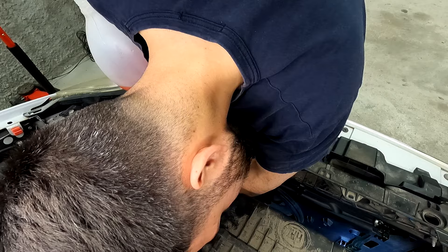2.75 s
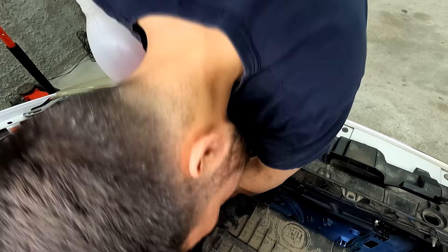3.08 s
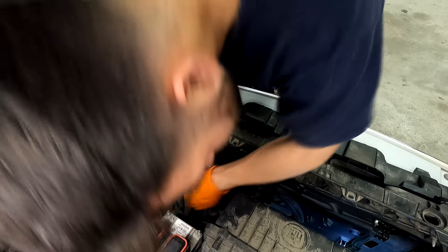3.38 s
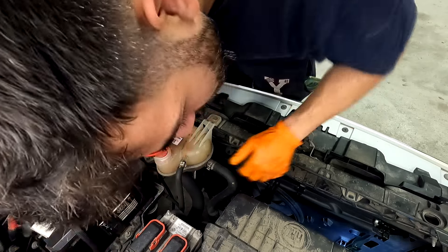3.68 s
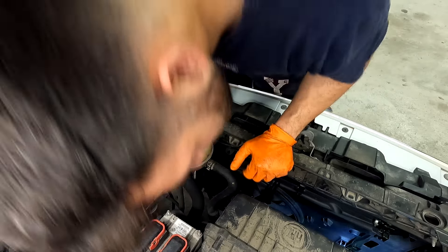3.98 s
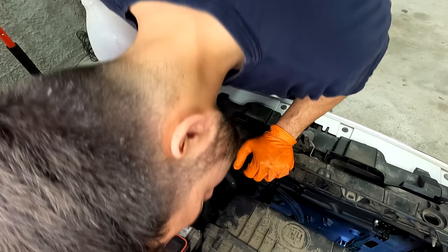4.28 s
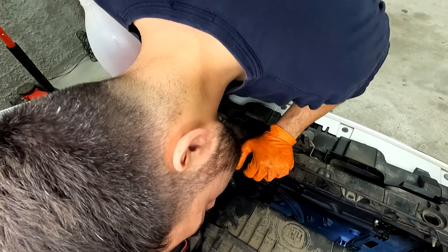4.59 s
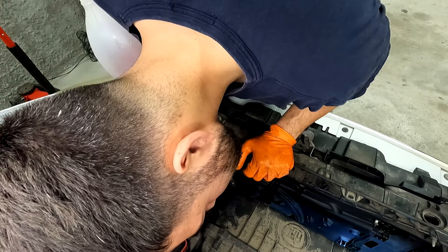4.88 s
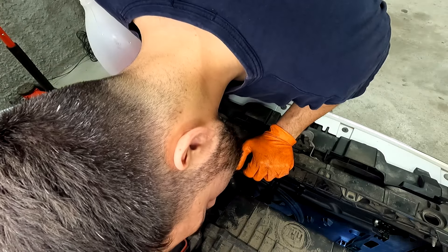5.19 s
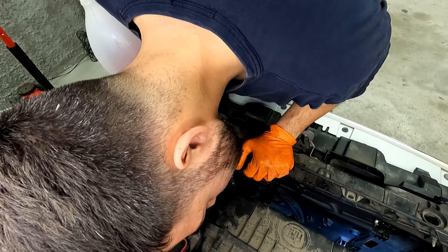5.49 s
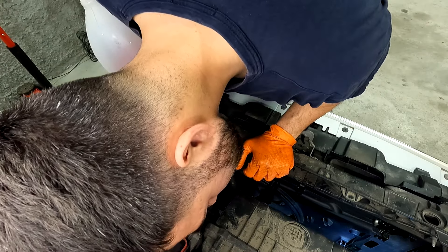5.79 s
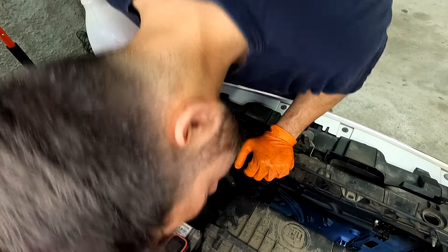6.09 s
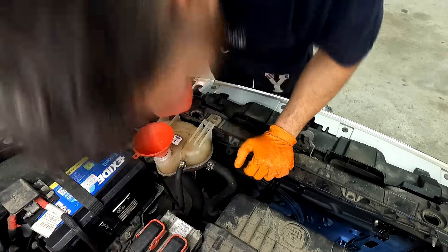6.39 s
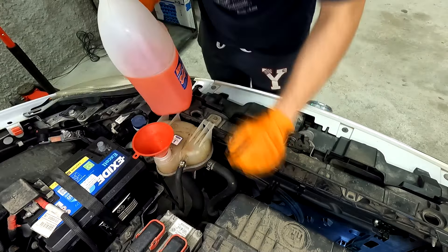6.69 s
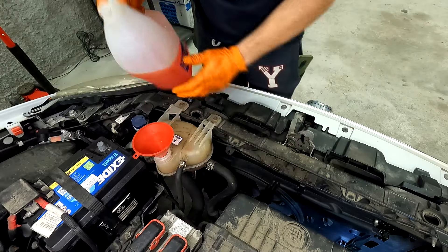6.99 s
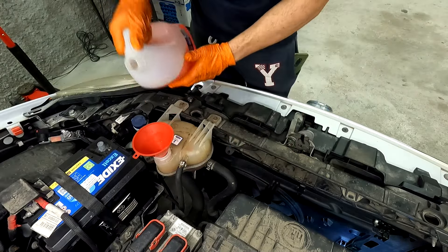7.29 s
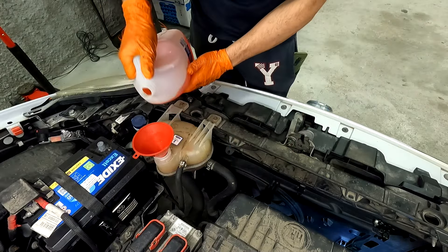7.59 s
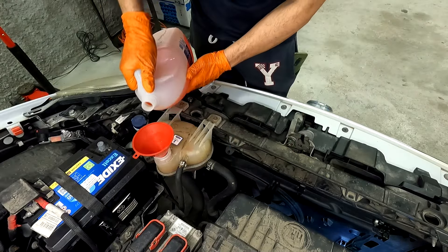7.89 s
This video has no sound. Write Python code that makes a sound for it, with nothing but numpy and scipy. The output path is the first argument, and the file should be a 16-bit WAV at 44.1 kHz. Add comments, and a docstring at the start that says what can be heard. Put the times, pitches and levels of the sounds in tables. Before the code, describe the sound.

Liquid glugs from a plastic jug, then trickles and gurgles steadily through a funnel into a car's hollow plastic tank.

```python
"""Coolant pours from a plastic jug through a funnel into a car's tank, in a garage.
First the jug glugs and booms as it gulps air, and a few drops tick. Then the stream gurgles on:
a swarm of bubbles, stirred up by the loud ones, rings in the hollow plastic. Each bubble is a
tiny, fading note; the bigger the bubble, the lower the note. Now and then the liquid sloshes,
once with a deep thump of the jug. The hard room adds a short echo and a faint hiss."""
import sys
import numpy as np
from scipy import signal
from scipy.io import wavfile

SR = 44100
rng = np.random.default_rng(int(sys.argv[2]) if len(sys.argv) > 2 else 0)


def transcribe(signal):
    """Save signal, clipped to [-1, 1], as a 16-bit WAV file at the path in sys.argv[1]."""
    frames = np.atleast_2d(signal).T
    limited = np.clip(frames, -1, 1)
    pcm = np.round(limited * 32767).astype(np.int16)
    wavfile.write(sys.argv[1], SR, pcm)


N = 399105
TIME = np.arange(N) / SR


def amp(db):
    """Turns decibels into a number to multiply a sound by."""
    return 10 ** (np.asarray(db) / 20)


def unit(x):
    """Scales a sound to an average strength (rms) of 1."""
    return x / np.sqrt(np.mean(x ** 2) + 1e-20)


def look_up(points, hz):
    """Reads between the rows of a table, with pitch spaced as on a piano."""
    f, value = np.transpose(points)
    return np.interp(np.log(hz + 1), np.log(f + 1), value)


def add(mix, s, sound):
    """Mixes a sound in, starting at s seconds."""
    part = mix[..., max(round(s * SR), 0):][..., :sound.shape[-1]]
    part += sound[..., :part.shape[-1]]


def place(x, pan_db=0):
    """Sends a sound to both ears; pan_db is how much louder the left one is."""
    return np.array([x * amp(pan_db / 2), x * amp(-pan_db / 2)])


def lowpass(x, hz, order=3):
    """Takes the treble off."""
    return signal.sosfilt(signal.butter(order, min(hz, .45 * SR), fs=SR, output="sos"), x)


def highpass(x, hz, order=3):
    """Takes the bass off."""
    return signal.sosfilt(signal.butter(order, hz, "high", fs=SR, output="sos"), x)


def wander(hz):
    """A random curve that drifts up and down, up to about hz times a second."""
    return unit(lowpass(rng.standard_normal(N), hz, order=2))


def colour(x, points, size=2048):
    """Shapes bass and treble to follow a table, while sharp starts stay sharp."""
    level_db = look_up(points, abs(np.fft.fftfreq(size, 1 / SR)))
    log_gain = np.log(amp(np.maximum(level_db, -90)))
    response = np.fft.ifft(np.exp(np.conj(signal.hilbert(log_gain)))).real[:size // 2]
    return signal.oaconvolve(x, response)[:len(x)]


def resonate(x, hz, width):
    """Rings at one pitch; the smaller the width, the longer the ring."""
    return signal.lfilter(*signal.iirpeak(min(hz, SR / 2 - 1), hz / min(width, SR / 4), SR), x)


def band(x, hz, width, widen=2):
    """Keeps the sound near one pitch, using a narrow filter and then a wider one."""
    return resonate(resonate(x, hz, width), hz, widen * width)


def ring(x, notes):
    """An object rings at all of its own notes at once."""
    return sum(amp(db) * resonate(x, hz, width) for hz, width, db in notes)


# The notes the jug's neck rings at: f/Hz, width/Hz, level/dB
NECK_NOTES = [(436, 13, 11.5), (644, 16, 10.5), (935, 16, 4.5), (1080, 37, -11), (1510, 4.3, 0),
              (2030, 12, -2)]
# Gulps of air: t/s, length/s, start f/Hz, end f/Hz, level/dB, loudest point/share of the length
GULPS = [(0.0, 0.016, 980, 1110, -45.5, 0.13), (0.029, 0.066, 425, 1186, -55.5, 0.61),
         (0.058, 0.02, 2550, 2800, -59, 0.48), (0.207, 0.095, 409, 1997, -47, 0.49),
         (0.285, 0.075, 584, 1092, -57, 0.74), (0.492, 0.072, 418, 1512, -47, 0.62)]


def glugs(level_db=-.5, neck_db=2, wobble=.017, rough=.42, wake_db=-19, wake_s=.022):
    """An air pocket pinches off and shrinks: its pitch climbs through the notes of the neck."""
    whistles, push = np.zeros((2, N))
    for s, length, start_hz, end_hz, db, loudest in GULPS:
        progress = np.arange(0, 1, 1 / (length * SR))
        shake, flutter = unit(lowpass(rng.standard_normal((2, SR // 4)), 250))[:, :len(progress)]
        hz = start_hz + (end_hz - start_hz) * np.sin(np.pi * progress ** 1.12 / 2) ** 2
        angle = 2 * np.pi * np.cumsum(hz * (1 + wobble * shake)) / SR
        hump = .18 + np.exp(-((progress - loudest) / .15) ** 2)
        swell = amp(db + level_db) * hump * signal.windows.tukey(len(progress), .15)
        add(whistles, s, swell * (1 + rough * flutter) * np.sin(angle))
        add(push, s, swell)
    # Each gulp leaves a hollow churning in its wake.
    churn = unit(band(rng.standard_normal(N), hz=1020, width=380))
    hold = np.exp(-1 / (wake_s * SR))
    wake = signal.lfilter([1 - hold], [1, -hold], push)
    out = whistles + amp(wake_db) * churn * wake
    return out + amp(neck_db) * ring(out, NECK_NOTES)


# The notes the tank and funnel ring at: f/Hz, width/Hz, level/dB
TANK_NOTES = [(904, 26, 6), (989, 56, 6.5), (1134, 80, -4.5), (1279, 96, -3.5), (1920, 130, -8.5),
              (2663, 270, -3), (3135, 93, -2.5), (3420, 60, 2.5), (3630, 36, -12), (4090, 27, -14),
              (4480, 45, -2), (4980, 83, -11), (5416, 80, -0.5)]


def tank(x, ring_db, uneven_db=0):
    """Adds the ring of the hollow plastic; uneven_db makes each note randomly louder or softer."""
    notes = TANK_NOTES
    if uneven_db:
        notes = [(hz, width, db + uneven_db * rng.standard_normal()) for hz, width, db in notes]
    return x + amp(ring_db) * ring(x, notes)


def bubble(hz, cycles, rise, size=2048):
    """A bubble rings and fades; its pitch climbs as it nears the surface."""
    age = hz * np.arange(size) / SR / cycles
    loudness = np.exp(-age) * (1 - np.exp(-(age * cycles) ** 2))
    return loudness * np.sin(2 * np.pi * cycles * (age + rise * (age - 1 + np.exp(-age))))


def burst(hz, cycles, rise, scatter, linger_s, stereo=.47, build_s=.00086, size=4096):
    """A bubble breaks into a cluster that echoes round the tank, a bit differently for each ear."""
    noise, t = rng.standard_normal((3, size)), np.arange(size) / SR
    fade = np.exp(-t / max(linger_s, .001)) * (1 - np.exp(-t / build_s))
    kicks = scatter * (noise[2] + stereo * noise[:2]) * fade
    kicks[:, 0] = 1  # the first bubble itself
    return signal.fftconvolve(kicks, bubble(hz, cycles, rise)[None], axes=1)[:, :size]


def plip(hz, length, rise=.064):
    """One bubble in the tank; where it bursts decides how strongly each tank note answers."""
    cluster = burst(hz / (1 + rise / 2), cycles=3.95, rise=rise, scatter=.2, linger_s=.86 * length)
    sound = tank(cluster, ring_db=-1, uneven_db=4)
    return sound / sound[:, :SR // 50].std()  # strength 1 over the first 20 ms


# Drops landing on plastic: t/s, level/dB, f/Hz, fade time/s
DROP_HITS = [(0.0, -56, 1960, 0.0016), (0.233, -54.5, 1980, 0.00055), (1.2837, -67, 6260, 0.025),
             (1.769, -70, 7450, 0.0063), (1.963, -58, 6600, 0.016), (2.159, -66, 2580, 0.023),
             (2.168, -58, 8230, 0.0029), (2.397, -66, 2840, 0.0067), (2.473, -65, 7040, 0.037),
             (2.635, -79, 5440, 0.0071), (2.89, -51, 3300, 0.054), (2.999, -45.5, 1160, 0.03),
             (3.0095, -44, 2100, 0.0043), (3.009, -48.5, 9900, 0.004), (3.0238, -45.5, 6200, 0.0044),
             (3.2532, -47, 5540, 0.016), (3.396, -42.5, 4800, 0.011), (3.6255, -42, 5500, 0.0046),
             (3.8764, -41, 1840, 0.0015), (4.2236, -42, 2420, 0.012), (4.2494, -49, 3070, 0.015),
             (4.639, -42, 2530, 0.029), (5.325, -44, 3450, 0.032), (6.3781, -41, 5100, 0.012),
             (6.523, -47, 2980, 0.011), (6.902, -44, 2190, 0.012), (7.299, -42.5, 1440, 0.0099),
             (7.345, -43.5, 5100, 0.013), (8.144, -44, 5470, 0.021), (8.233, -48, 2020, 0.0075),
             (8.774, -60, 4200, 0.014), (8.975, -46, 2200, 0.014)]


def splats(slap_db=-4, bubble_db=-7.5, stereo=.43, size=4096):
    """A drop slaps the plastic, makes it ring and traps a bubble of the same pitch."""
    out, t = np.zeros((2, N)), np.arange(size) / SR
    for s, db, hz, fade_s in DROP_HITS:
        noise = rng.standard_normal((3, size))
        crack = band(noise[2] + stereo * noise[:2], hz, width=.94 * hz)
        crack = crack * (1 - np.exp(-t / (.063 * fade_s))) * np.exp(-t / fade_s)
        slap = unit(lowpass(crack, min(4.8 * hz, 10500))) * np.sqrt(fade_s * SR / (2 * size))
        add(out, s, amp(db + slap_db) * tank(slap, ring_db=-4))
        add(out, s, amp(db + bubble_db) * plip(hz, length=.0069))
    return out


# The garage's background noise, from bass to treble: f/Hz, level/dB
ROOM_COLOUR = [(15, -33), (25, -16.5), (119, -24), (164, -3.5), (225, -9), (244, -10), (448, -22.5),
               (569, -24), (781, -26.5), (2030, -33), (2570, -42), (3930, -44.5), (6160, -40),
               (9170, -52.5), (14000, -61)]


def room_noise(level_db=-68.5, side_db=-13, waver_db=2):
    """The garage hisses steadily over a low murmur that wavers."""
    noise = np.array([unit(colour(rng.standard_normal(N), ROOM_COLOUR)) for _ in range(2)])
    waver = amp(waver_db * np.tanh(wander(hz=7)))
    middle, side = noise + (waver - 1) * lowpass(noise, 320, order=1)
    return amp(level_db) * (place(middle, pan_db=-11) + amp(side_db) * np.array([side, -side]))


# How the rumble of the air in the tank swells and sinks: t/s, level/dB
RUMBLE_LEVELS = [(2.0, -8.5), (2.9, -3), (3.2, 2.5), (3.55, -5.5), (3.9, 0.5), (4.8, -2.5), (5.4, -5.5),
                 (9.0, -10.5)]


def tank_rumble(level_db=-65, lumpy_db=6.5):
    """The stream keeps the air in the tank rumbling, in uneven lumps."""
    noise = band(rng.standard_normal(N), hz=160, width=85, widen=3)
    rumble = unit(highpass(noise, 130, order=6))
    lumps_db = lumpy_db * np.tanh(wander(hz=12))
    swell_db = np.interp(TIME, *np.transpose(RUMBLE_LEVELS))
    return place(amp(level_db + swell_db + lumps_db) * rumble)


# Booms of the air in the jug: t/s, f/Hz, level/dB, time to fade by 60 dB/s, build-up time/s
JUG_BOOMS = [(0.059, 106.8, -34, 0.33, 0.01), (0.086, 112, -43, 0.27, .006),
             (0.214, 108.6, -31.5, 0.33, 0.0061), (0.332, 108.5, -35.5, 0.097, 0.005),
             (0.509, 112, -37, 0.092, 0.0073), (6.743, 161, -42.5, 0.22, 0.009),
             (6.795, 134, -21.5, 0.071, 0.013), (6.849, 139, -31, .08, 0.013),
             (6.906, 145.3, -20, 0.17, 0.0074), (6.969, 140.5, -34.5, 0.18, 0.009)]


def booms(rumble_db=-21, rumble_fade_s=.52, flat=.052, settle_s=.011):
    """The jug's air bounces on its neck: a deep note that starts a bit flat, then a room rumble."""
    out, t = np.zeros(N), np.arange(SR // 2) / SR
    lag_s = flat * settle_s * (1 - np.exp(-t / settle_s))
    for s, hz, db, fade_s, build_s in JUG_BOOMS:
        note = np.sin(2 * np.pi * hz * (t - lag_s)) * amp(-60 * t / fade_s)
        rumble = unit(band(rng.standard_normal(len(t)), hz, width=70))
        rumble *= amp(rumble_db - 60 * t / rumble_fade_s)
        add(out, s, amp(db) * (note + rumble) * (1 - np.exp(-(t / build_s) ** 2)))
    return highpass(out, 55, order=1)


def jug_pop(s=.0885, crack_db=-37.5, crack_hz=2700, crack_s=.0034, ring_db=-55, ring_s=.025):
    """The jug's thin wall pops back as air rushes in: a sharp crack and a short ring."""
    out, t = np.zeros(N), np.arange(SR // 3) / SR
    crack_noise, ring_noise = rng.standard_normal((2, len(t)))
    crack = lowpass(resonate(crack_noise, crack_hz, crack_hz / 2), 1.2 * crack_hz)
    crack *= np.exp(-t / crack_s)
    tail = unit(band(ring_noise, hz=2980, width=220)) * np.exp(-t / ring_s)
    add(out, s, amp(crack_db) * crack / abs(crack).max() + amp(ring_db) * tail)
    return place(out)


# The bubbles that stand out: t/s, f/Hz, level/dB, burst length/s
LOUD_BUBBLES = [(0.42, 6760, -66, .013), (1.894, 5020, -63, 0.0067), (1.959, 5200, -66, .012),
                (2.504, 2570, -63.5, 0.015), (2.491, 5200, -64.5, .014), (2.55, 5030, -61, 0.014),
                (2.785, 998, -55.5, 0.012), (2.795, 3110, -56.5, 0.017), (2.889, 3050, -52.5, 0.0072),
                (2.947, 1220, -45.5, 0.0097), (3.011, 10000, -62, .0087), (3.012, 1340, -46.5, 0.0055),
                (3.048, 830, -49.5, 0.0079), (3.115, 1295, -52, 0.034), (3.152, 6440, -47, 0.013),
                (3.173, 1490, -49, 0.013), (3.204, 5170, -54.5, 0.0082), (3.247, 1256, -50, 0.0083),
                (3.454, 1310, -49, 0.013), (3.536, 6300, -53.5, .007), (3.565, 1510, -48.5, .008),
                (3.566, 2900, -54, 0.0056), (3.676, 2900, -54, .008), (3.749, 1890, -50, 0.034),
                (3.915, 1500, -48.5, 0.009), (3.959, 1410, -54, .01), (4.032, 860, -50, 0.026),
                (4.17, 907, -55.5, .012), (4.134, 5470, -53.5, 0.014), (4.139, 2410, -52, 0.0081),
                (4.218, 682, -55.5, 0.08), (4.248, 5860, -51.5, 0.0092), (4.25, 1830, -52, .008),
                (4.275, 3650, -49.5, 0.0097), (4.277, 1437, -55, .009), (4.312, 4250, -44.5, .013),
                (4.317, 1440, -53.5, 0.01), (4.331, 2600, -48.5, 0.0042), (4.431, 917, -50, 0.022),
                (4.438, 3830, -50.5, 0.042), (4.652, 5300, -53, 0.014), (4.669, 693, -55, 0.0099),
                (4.684, 1340, -53, .012), (4.74, 1930, -46.5, .009), (4.777, 1870, -55, .007),
                (4.801, 983, -44.5, 0.0056), (4.86, 1154, -46.5, 0.013), (4.919, 5250, -52.5, 0.014),
                (4.926, 2600, -51, 0.023), (4.97, 1115, -54.5, .009), (5.078, 1400, -51, .017),
                (5.081, 5170, -50.5, 0.021), (5.129, 4040, -49.5, 0.049), (5.146, 910, -54, .012),
                (5.16, 6800, -52, 0.027), (5.169, 2100, -52, 0.017), (5.233, 3400, -45, .012),
                (5.252, 970, -46.5, .014), (5.293, 5270, -53, 0.0059), (5.489, 5220, -51, 0.017),
                (5.498, 1025, -53, 0.0083), (5.577, 1310, -49.5, 0.029), (5.65, 3600, -50.5, 0.0069),
                (5.679, 5400, -50.5, .008), (5.757, 6140, -53, 0.0093), (5.765, 950, -49, 0.019),
                (5.863, 1320, -57.5, 0.0079), (5.855, 3050, -50, 0.011), (5.897, 3130, -50, 0.028),
                (5.958, 3445, -51.5, 0.0064), (6.031, 1610, -53.5, 0.012), (6.192, 1010, -51, 0.0064),
                (6.249, 1060, -48, 0.021), (6.252, 5760, -58, 0.0067), (6.292, 947, -47.5, 0.017),
                (6.315, 1040, -43, 0.012), (6.321, 1330, -46, .011), (6.35, 4060, -46, 0.029),
                (6.362, 1124, -46.5, 0.051), (6.486, 5670, -53, .01), (6.494, 680, -47, 0.011),
                (6.523, 940, -46, 0.0089), (6.528, 1185, -45, 0.0056), (6.565, 1110, -50, 0.014),
                (6.609, 7300, -51.5, 0.0099), (6.637, 1180, -48, .022), (6.643, 5250, -52, 0.0068),
                (6.714, 3340, -52, 0.016), (6.717, 1437, -54.5, .009), (6.749, 640, -52, 0.0099),
                (6.751, 2120, -47.5, 0.01), (6.873, 1127, -41, 0.009), (6.906, 1007, -46, 0.0035),
                (6.955, 1390, -49, 0.0036), (7.121, 7150, -57, 0.0095), (7.174, 1106, -51, .014),
                (7.228, 3900, -49.5, 0.021), (7.298, 664, -45.5, .0068), (7.332, 4700, -50, .012),
                (7.339, 668, -54, 0.0073), (7.384, 2780, -51, 0.013), (7.426, 1273, -48, 0.019),
                (7.429, 3050, -50, .01), (7.557, 620, -55, 0.0082), (7.683, 1270, -44, 0.0046),
                (7.703, 1010, -46.5, 0.0096), (7.714, 5960, -50.5, 0.013), (7.721, 1160, -50, 0.0089),
                (7.736, 1010, -45.5, 0.0073), (7.751, 6700, -53, 0.17), (7.895, 1397, -46.5, .016),
                (7.979, 3630, -55, 0.0095), (8.079, 3980, -47.5, 0.01), (8.145, 3850, -44, 0.012),
                (8.197, 1437, -51, 0.013), (8.229, 698, -46.5, 0.0098), (8.235, 1230, -52.5, 0.033),
                (8.27, 690, -58, 0.0093), (8.361, 4080, -54, 0.0078), (8.381, 683, -49.5, 0.011),
                (8.403, 1410, -48.5, 0.0093), (8.427, 1020, -55.5, 0.044), (8.435, 3670, -54, 0.0077),
                (8.502, 5550, -53.5, 0.02), (8.504, 3443, -56, .008), (8.563, 666, -54, 0.014),
                (8.593, 5170, -52, 0.013), (8.604, 2860, -56, .014), (8.632, 3320, -54.5, 0.0086),
                (8.674, 4400, -46.5, .01), (8.719, 1530, -49, 0.02), (8.752, 1030, -49.5, .011),
                (8.769, 1350, -44, 0.014), (8.78, 4320, -45, 0.014), (8.805, 1580, -49, .02),
                (8.817, 2970, -50, 0.051), (8.92, 1310, -50.5, .012), (8.935, 4100, -51.5, 0.009),
                (8.973, 1420, -44, 0.016), (8.994, 4300, -52, 0.0083)]
LARGE_BELOW_HZ = 2200  # bubbles lower than this count as large


def loud_bubbles(level_db=-1, pieces=2, piece_db=-10, within_s=.075):
    """Single plips and blubs; each large one breaks into weaker, mostly higher bubbles."""
    out = np.zeros((2, N))
    chances = rng.random((len(LOUD_BUBBLES), pieces, 2))
    for (s, hz, db, length), chance in zip(LOUD_BUBBLES, chances):
        add(out, s, amp(db + level_db) * plip(hz, length))
        if hz < LARGE_BELOW_HZ:
            for k, (late, pitch) in enumerate(chance):
                octaves_up = .2 + .548 * (2 * pitch - 1)
                piece = plip(hz * 2 ** octaves_up, length=.011) / np.sqrt(k + 1)
                add(out, s + within_s * (k + late) / pieces, amp(db + piece_db) * piece)
    return out


# Bubbles that stay whole, and first the jug's neck ringing on after the last gulp: t/s, f/Hz, level/dB, fade
# time/s
WHOLE_BUBBLES = [(0.551, 1507, -64, .07), (2.788, 991, -46, 0.026), (3.765, 1875, -56, 0.064),
                 (4.09, 885, -48, 0.027), (7.579, 1725, -54.5, 0.032), (8.039, 1735, -51, 0.036),
                 (8.51, 1730, -52, 0.035)]


def singing_bubbles(build_s=.0071, sag=.0192, sag_s=.037):
    """A whole bubble swells into a thin, pure note whose pitch sags a little as it fades; the jug's neck rings
    on the same way after the last gulp."""
    out, t = np.zeros(N), np.arange(SR // 3) / SR
    bend = 1 - sag * (1 - np.exp(-t / sag_s))
    swell = 1 - np.exp(-(t / build_s) ** 2)
    for s, hz, db, fade_s in WHOLE_BUBBLES:
        angle = 2 * np.pi * np.cumsum(hz * bend) / SR
        add(out, s, amp(db) * np.sin(angle) * swell * np.exp(-t / fade_s))
    return place(out)


# How strongly the liquid runs: t/s, large bubble level/dB, fine splash level/dB
FLOW_LEVELS = [(.8, -76, -84), (2.0, -76, -77), (2.45, -65.5, -78), (2.78, -77, -72), (3.04, -58, -57),
               (3.32, -100, -58), (3.46, -68, -50), (3.85, -69, -59), (4.02, -53, -53.5), (4.42, -54, -58),
               (4.57, -56, -52.5), (4.68, -51.5, -58.5), (5.03, -58.5, -56), (5.28, -54, -51.5),
               (5.52, -61, -56.5), (5.86, -52.5, -52.5), (6.6, -62.5, -58), (7.08, -57, -57.5),
               (7.42, -52.5, -49.5), (7.58, -63.5, -60), (8.02, -59, -57), (8.42, -60.5, -56.5),
               (9.05, -52, -53)]


def flow():
    """The strength of the large bubbles and of the fine splash at every moment."""
    when, large_db, fine_db = np.transpose(FLOW_LEVELS)
    return amp(np.interp(TIME, when, large_db)), amp(np.interp(TIME, when, fine_db))


def stir(low_hz, high_hz, calm_s=.041):
    """Each loud bubble in this pitch range stirs up the swarm, which soon calms down again."""
    t = TIME[::100]
    power = sum(amp(2 * db) * np.exp(-2 * abs(t - s) / calm_s) * (t > s)
                for s, hz, db, _ in LOUD_BUBBLES if low_hz <= hz < high_hz)
    return np.interp(TIME, t, np.sqrt(power))


def froth(per_s, spread_db, cycles, linger_s, sizes=96):
    """A swarm of random bubbles of many sizes, a few much louder than the rest."""
    out = np.zeros((2, N))
    sounds = [unit(burst(hz, cycles, rise=.25, scatter=.15, linger_s=linger_s, size=2048)) * np.sqrt(hz)
              for hz in np.geomspace(250, 13000, sizes)]
    when, loud, pitch = rng.random((30000, 3))[:int(per_s * N / SR)].T
    gains = amp(spread_db * np.minimum(-np.log(1 - loud), 3))
    for s, gain, k in zip(when * N / SR, gains, (pitch * sizes).astype(int)):
        add(out, s, gain * sounds[k])
    return out


# The gurgle, from bass to treble: f/Hz, level/dB
GURGLE_COLOUR = [(90, -12), (200, 12.5), (300, -3), (450, -8), (560, -7), (660, -3.5), (790, -5.5),
                 (1000, -3.5), (1300, 4), (2200, -4.5), (3200, -9.5), (5000, -9), (7400, -9.5),
                 (10000, -24.5), (14000, -32.5)]
# The foam of the very finest bubbles: t/s, level/dB
FOAM_LEVELS = [(2.8, -112), (3.0, -68), (3.8, -72.5), (6.9, -76), (7.7, -62), (8.3, -60.5), (8.7, -66.5)]


def stream(gurgle_db=-5, fizz_db=-2, spurt_db=2):
    """The running stream fills the tank with bubbles: large ones gurgle, small ones fizz in spurts."""
    large, fine = flow()
    stir_large, stir_fine = stir(0, LARGE_BELOW_HZ), stir(LARGE_BELOW_HZ, SR)
    swarm = froth(per_s=1700, spread_db=4, cycles=4, linger_s=.009)
    swarm = np.array([colour(tank(ear, ring_db=-1), GURGLE_COLOUR) for ear in swarm])
    spurts = amp(spurt_db * wander(hz=62))
    gurgle_gain = np.hypot(amp(gurgle_db) * large, amp(-11) * stir_large)
    fizz_gain = np.hypot(amp(fizz_db) * fine, amp(-13) * stir_fine + amp(-16) * stir_large)
    gurgle = unit(lowpass(swarm, LARGE_BELOW_HZ)) * gurgle_gain
    fizz = unit(highpass(swarm, LARGE_BELOW_HZ)) * fizz_gain
    foam = unit(highpass(swarm, 8000, order=4)) * amp(np.interp(TIME, *np.transpose(FOAM_LEVELS)))
    return gurgle + spurts * fizz + foam


def droplets(per_s=45, level_db=-27, spread_db=5, tick_s=.00065):
    """Tiny drops thrown off the stream tick on the funnel's rim."""
    _, fine = flow()
    chance, size = rng.random((2, N))
    hits = (chance < per_s / SR) * amp(spread_db * np.minimum(-np.log(1 - size), 3))
    fades = signal.lfilter([1], [1, -np.exp(-1 / (tick_s * SR))], hits)
    ticks = unit(highpass(fades * rng.standard_normal((2, N)), 6500))
    return amp(level_db) * fine * ticks


# The bubbles in a slosh, from bass to treble: f/Hz, level/dB
SURGE_COLOUR = [(180, -17), (300, -8), (520, -8), (760, -14), (1000, 1), (1400, 0.5), (2200, -2.5),
                (3200, -3.5), (5400, -11), (8000, -25), (14000, -33)]
# The low notes of the hollow jug under a slosh: f/Hz, width/Hz, level/dB
JUG_NOTES = [(178.5, 36, 4.5), (296, 47, -2.5), (450, 60, -16)]
# The swish of a sheet of liquid, from bass to treble: f/Hz, level/dB
SWISH_COLOUR = [(900, -26), (2200, 9.5), (3600, -0.5), (6000, -3), (8000, -10), (14000, -25)]
# Sloshes: peak t/s, rise/s, fall/s, level/dB, bass/dB and swish/dB (both relative to the bubbles)
SURGES = [(2.42, 0.038, 0.12, -78, 17, -13), (3.22, 0.067, 0.029, -59.5, 2, 1),
          (3.51, 0.084, 0.028, -49, -1, -4.5), (3.76, 0.063, 0.036, -65.5, 6.5, -12),
          (6.868, 0.1, 0.023, -43.5, -12, -15), (6.925, 0.032, 0.051, -58.5, 4, -19),
          (7.68, 0.042, 0.031, -52, -24, -3)]


def sloshes():
    """Liquid surges along the wall: bubbles swell and fall with a soft swish over a hollow bass."""
    swarm = froth(per_s=1300, spread_db=3, cycles=3.5, linger_s=.007)
    swarm = unit(np.array([colour(tank(ear, ring_db=0), SURGE_COLOUR) for ear in swarm]))
    hollow = ring(rng.standard_normal(N), JUG_NOTES)
    bass = unit(lowpass(highpass(hollow, 135), 480))
    swish = unit(colour(rng.standard_normal(N), SWISH_COLOUR))
    out = np.zeros((2, N))
    for s, rise, fall, db, bass_db, swish_db in SURGES:
        swell = np.exp(-((TIME - s) / np.where(TIME < s, rise, fall)) ** 2)
        out += amp(db) * swell * (swarm + amp(bass_db) * bass + amp(swish_db) * swish)
    return out


def soft_bubbles(strength, per_s, hz, octaves, level_db, spread_db, length, start_s=2.95, count=120):
    """Once the thin thread becomes a full stream, softer plips come loosely spaced, as strong as it."""
    out = np.zeros((2, N))
    for k, (late, pitch, loud) in enumerate(rng.uniform(-1, 1, (count, 3))):
        s = start_s + (k + 1 + late) / per_s
        if s < TIME[-1]:
            gain = strength[int(s * SR)] * amp(level_db + spread_db * loud)
            add(out, s, gain * plip(hz * 2 ** (octaves * pitch), length))
    return out


# How long the garage echoes: f/Hz, time to fade by 60 dB/s
ECHO_TIMES = [(120, 0.53), (500, 0.47), (1400, 0.53), (3300, 0.52), (8000, 0.44), (14000, 0.15)]


def garage(x, tail_db, early_db=-9, early_s=.02, shared=.85):
    """Sound bounces off the nearby engine bay, then dies away in the hard room."""
    t = np.arange(SR) / SR
    after_gap = t > .002
    echoes = rng.standard_normal((3, SR)) * (rng.random((3, SR)) < .08) * after_gap
    echoes = echoes[:2] + shared * echoes[2]  # both ears hear partly the same echoes
    hz, when, bands = signal.stft(echoes, SR, nperseg=256)
    fade = amp(-60 * when / look_up(ECHO_TIMES, hz)[:, None])
    tail = signal.istft(bands * fade, SR, nperseg=256)[1][:, :SR]
    early = echoes[:, ::-1] * np.exp(-t / early_s) * after_gap
    response = (amp(early_db) * unit(early) + amp(tail_db) * unit(tail)) / np.sqrt(SR)
    return x + signal.fftconvolve(x.mean(0)[None], response, axes=1)[:, :N]


def scene():
    """Mixes the liquid, the jug and the room."""
    large, fine = flow()
    blubs = soft_bubbles(large, per_s=7, hz=828, octaves=.29, level_db=-8, spread_db=-.5, length=.029)
    plips = soft_bubbles(large, per_s=11, hz=1240, octaves=.48, level_db=-5, spread_db=2.5, length=.017)
    plinks = soft_bubbles(fine, per_s=16, hz=3910, octaves=.57, level_db=-9, spread_db=1, length=.005)
    pour = blubs + plips + plinks + stream() + droplets()
    jug = garage(place(glugs()) + jug_pop(), tail_db=-11.5)
    liquid = garage(pour + loud_bubbles() + singing_bubbles() + splats() + sloshes(), tail_db=-8)
    return liquid + jug + booms() + tank_rumble() + room_noise()


def record(dry):
    """Cuts off the very highest treble, above 14200 Hz."""
    treble_cut = signal.firwin(511, 14200, window=("kaiser", 9), fs=SR)
    return signal.oaconvolve(dry, treble_cut[None], "same")


dry = scene()
out = record(dry)
transcribe(out)
```